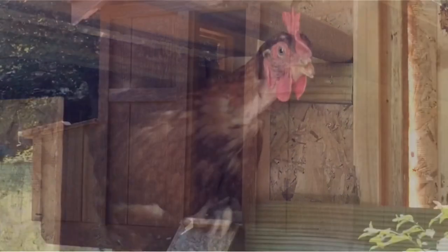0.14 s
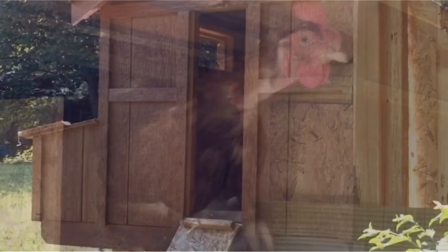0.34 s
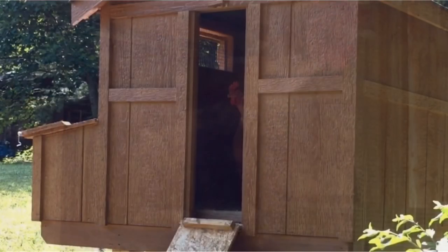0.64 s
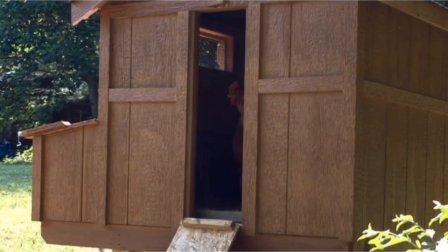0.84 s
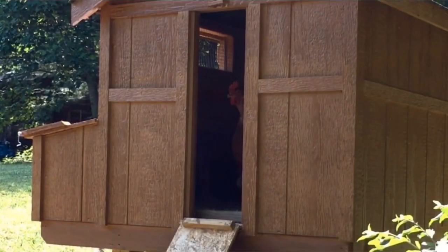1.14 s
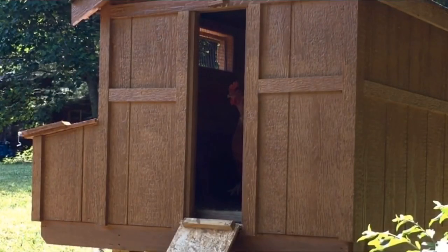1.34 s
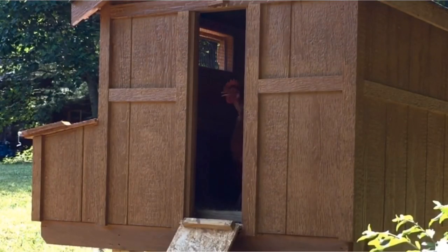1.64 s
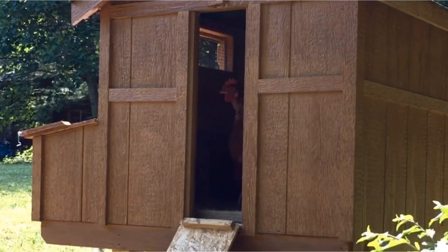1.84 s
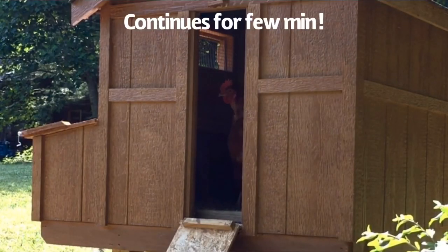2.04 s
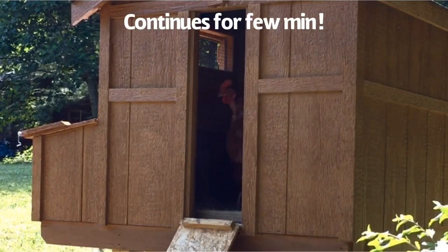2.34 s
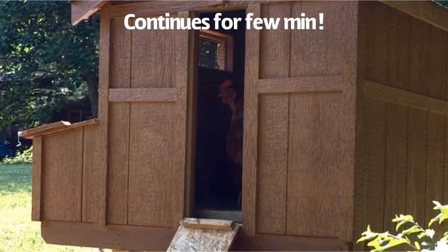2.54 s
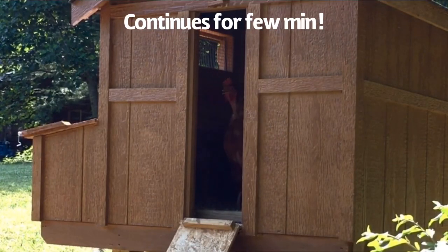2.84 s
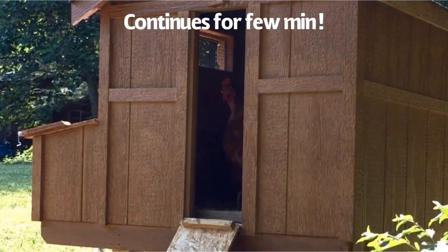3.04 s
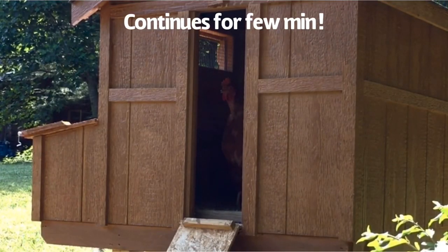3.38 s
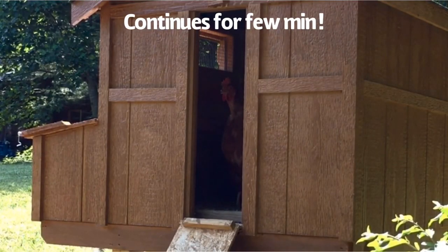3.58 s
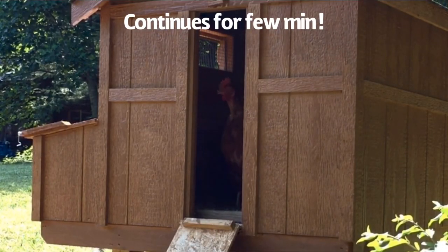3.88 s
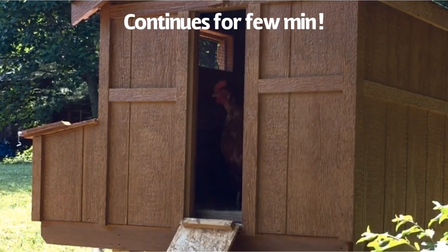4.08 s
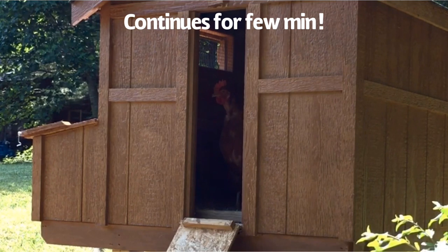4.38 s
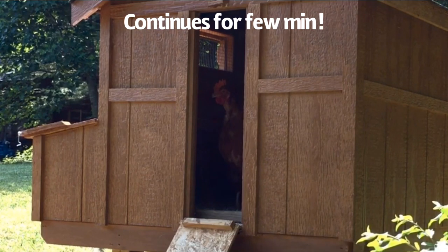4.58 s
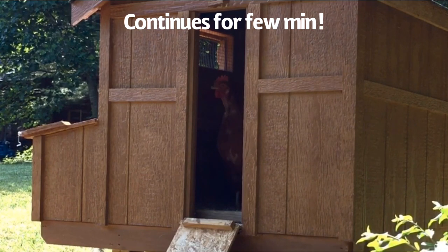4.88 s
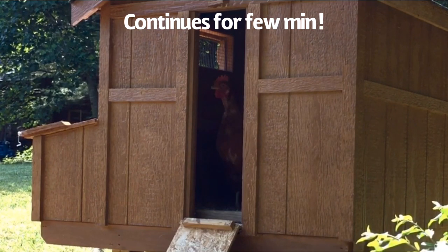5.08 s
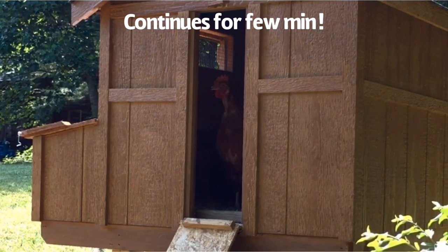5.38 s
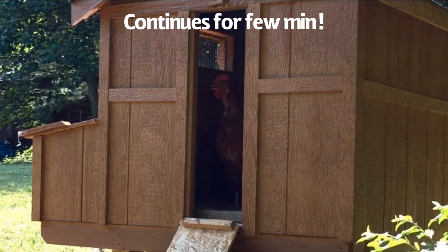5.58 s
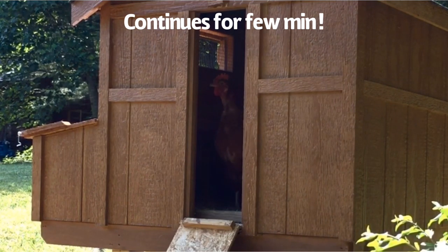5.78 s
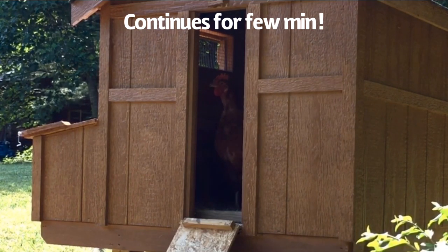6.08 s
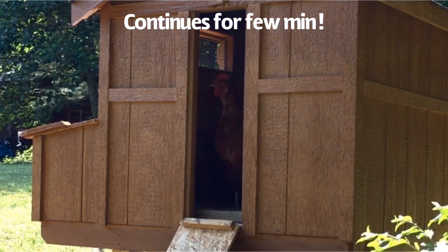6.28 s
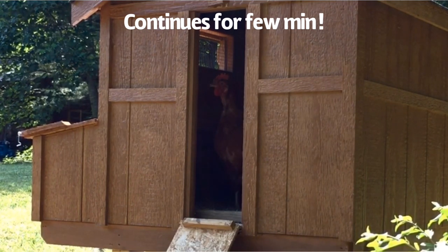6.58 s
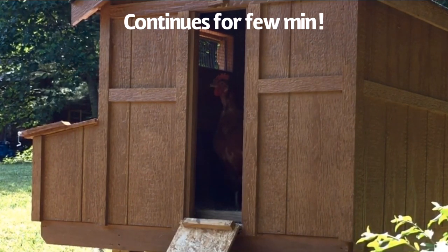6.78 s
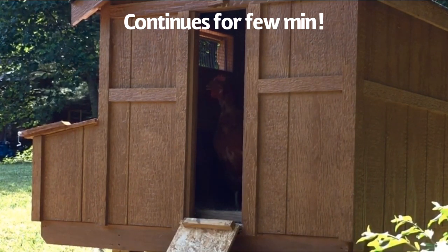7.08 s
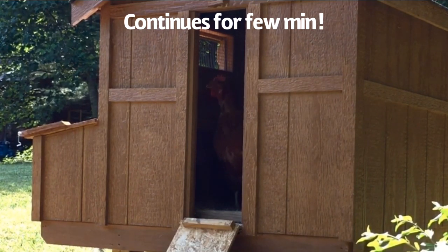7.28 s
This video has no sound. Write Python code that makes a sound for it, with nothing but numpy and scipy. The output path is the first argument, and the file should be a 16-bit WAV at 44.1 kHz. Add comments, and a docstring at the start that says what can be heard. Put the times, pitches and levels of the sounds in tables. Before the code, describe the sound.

In a quiet yard, two hens call at once, the nearer one barking loudly and stopping short within the first second. The other, some way off in a wooden coop, keeps up spaced, raspy clucks that now and then crack upward into a squawk, with a slight ring from the boards. Thin bird whistles, a very faint cricket and a low outdoor rumble lie underneath, and wind softly bumps the microphone.

```python
"""A yard with a wooden hen coop, heard through one microphone. Some way off, a hen in the doorway gives
low rattling clucks; some break into a loud squawk over an octave up. Her syrinx snaps shut once a cycle,
throat and doorway colour the pulses, and the boards ring. At first a second hen, much nearer, barks over
her until an edit cuts off that hen and her echoes mid-bark. Behind them are a songbird, a faint cricket,
light wind and a far rumble."""
import sys
import numpy as np
from scipy import signal
from scipy.fft import rfft, irfft
from scipy.io import wavfile
from scipy.ndimage import uniform_filter1d

SR = 44100
rng = np.random.default_rng(int(sys.argv[2]) if len(sys.argv) > 2 else 0)


def inscribe(sig):
    """Save sig as 16-bit PCM at rate SR to the path in sys.argv[1].

    A 1-D sig is mono; a 2-D sig holds one channel per row.
    Samples are clipped to [-1, 1] before scaling.
    """
    pcm = np.round(np.clip(np.atleast_2d(sig).T, -1, 1) * 32767)
    wavfile.write(sys.argv[1], SR, pcm.astype(np.int16))


N = 327222
T = np.arange(N) / SR


def from_db(db):
    """Decibels to gain."""
    return 10 ** (np.asarray(db) / 20)


def rms_one(x):
    """Scale to rms 1."""
    return x / np.sqrt(np.mean(x ** 2) + 1e-20)


def drift(rate_hz):
    """A smooth random wander of rms 1."""
    r = np.exp(-2 * np.pi * rate_hz / SR)
    return rms_one(signal.lfilter([1], [1, -2 * r, r * r], rng.standard_normal(N + SR))[SR:])


def filtered(x, kind, hz):
    """A gentle low-, high- or band-pass."""
    return signal.sosfilt(signal.butter(2, hz, kind, fs=SR, output="sos"), x)


def resonate(x, hz, width_hz):
    """One resonance with gain 1 at its peak."""
    r = np.exp(-np.pi * width_hz / SR)
    poles = [1, -2 * r * np.cos(2 * np.pi * hz / SR), r * r]
    return signal.lfilter([(1 - r * r) / 2, 0, (r * r - 1) / 2], poles, x)


def coloured(x, points, size=4096):
    """A minimum-phase filter through (Hz, dB) points: it rings after a pulse, never before."""
    hz, db = np.transpose(points)
    grid_hz = np.maximum(np.fft.rfftfreq(size, 1 / SR), 1)
    gain = from_db(np.interp(np.log(grid_hz), np.log(hz), db))
    cepstrum = irfft(np.log(gain), size)
    cepstrum[1:size // 2] *= 2
    cepstrum[size // 2 + 1:] = 0
    return signal.fftconvolve(x, irfft(np.exp(rfft(cepstrum)), size))[:N]


def echoes(x, t60, level_db, gap_s, band_hz):
    """Dense reflections: decaying band noise after a first gap."""
    t = T[:int(t60 * SR)]
    tail = rng.standard_normal(2 * SR)[:len(t)] * from_db(-60 * t / t60)
    tail = filtered(tail, "band", band_hz)
    tail = np.r_[np.zeros(int(gap_s * SR)), tail / np.sqrt(np.sum(tail ** 2))]
    return from_db(level_db) * signal.fftconvolve(x, tail)[:N]


# The open air, far beyond the yard. Each row: frequency in Hz, relative noise density in dB.
AIR_COLOUR = [(20, -17.5), (65, 0.5), (160, -11.5), (300, -20.5), (1200, -27), (3500, -27), (6000, -35.5),
              (15600, -44.5)]
# Wind puffs right on the microphone. Each row: centre in seconds, strength in dB.
WIND_PUFFS = [(1.936, -39.5), (3.763, -46)]

def outdoors():
    """Far rumble and leaf hiss; wind swells the bass and puffs on the microphone."""
    air = rms_one(coloured(rng.standard_normal(N), AIR_COLOUR))
    bass_swell = filtered(air, "low", 120) * (from_db(1.39 * drift(3.6)) - 1)
    out = from_db(-65) * (air + bass_swell)
    for centre, strength_db in WIND_PUFFS:
        u = (T - centre) / .005
        out += from_db(strength_db) * u * np.exp(-u ** 2 / 2)
    return out


def cricket(wing_hz=5200, width_hz=250):
    """The wings' narrow resonance: a faint song that comes and goes."""
    throb = from_db(2.6 * drift(.6))
    song = resonate(rng.standard_normal(N) * throb, wing_hz, width_hz)
    return from_db(-89) * rms_one(resonate(song, wing_hz, width_hz))


# A songbird off in the trees. Each row: start in seconds, first pitch in Hz, seconds to the turn,
# pitch there in Hz, seconds from turn to end, last pitch in Hz, level in dB for a pitch of 3500 Hz.
BIRD_NOTES = [(1.122, 4700, .045, 2650, .033, 3600, -66), (1.825, 3000, .03, 3650, .055, 2700, -65),
              (2.012, 2800, .022, 3900, .03, 2750, -63), (2.04, 3800, .04, 3750, .04, 3600, -65),
              (3.69, 4100, .03, 5400, .05, 5050, -71), (3.925, 2600, .03, 3450, .075, 2300, -65),
              (4.068, 3600, .03, 5200, .028, 2900, -68), (4.118, 2900, .012, 2850, .012, 2800, -66),
              (4.792, 3200, .02, 4100, .028, 5200, -66), (4.91, 2600, .022, 3050, .03, 2700, -62),
              (5.6, 3000, .04, 4400, .04, 2500, -67), (5.72, 2800, .022, 2900, .035, 4200, -65),
              (6.35, 5200, .035, 3500, .08, 5200, -72), (6.497, 2900, .02, 2830, .022, 2800, -68),
              (6.535, 2800, .033, 3750, .045, 2400, -66)]

def songbird():
    """Thin, wavering whistles that glide and turn, smeared by the trees."""
    out = np.zeros(N)
    for start, first_hz, to_turn, turn_hz, to_end, last_hz, level_db in BIRD_NOTES:
        on = slice(int(start * SR), int((start + to_turn + to_end) * SR))
        pitch = np.interp(T[on] - start, [0, to_turn, to_turn + to_end], [first_hz, turn_hz, last_hz])
        pitch = uniform_filter1d(pitch, size=500, mode="nearest")   # rounded turns
        swell = np.hanning(len(pitch)) ** .25 * (3500 / pitch) ** 1.2   # low turns carry best
        out[on] += from_db(level_db) * swell * np.sin(2 * np.pi * np.cumsum(pitch) / SR)
    wavering = out * from_db(3 * drift(40))
    return wavering + echoes(out, t60=.45, level_db=-7, gap_s=.006, band_hz=[2000, 6000])


def coop_reflections(x):
    """Bright first reflections off the door frame and the duller ring of the boards."""
    frame = echoes(x, t60=.084, level_db=-12, gap_s=.001079, band_hz=[2500, 12000])
    boards = echoes(x, t60=.1, level_db=-16, gap_s=.004057, band_hz=[500, 900])
    return frame + boards


def contours(calls):
    """Join calls, each a list of (seconds, Hz, dB, rasp 0-1) points, into pitch, gain and rasp."""
    points = []
    for call in calls:   # each sets in within 3 ms and dies within 9 ms
        first, last = call[0], call[-1]
        points += [(first[0] - .003, first[1], -80, first[3]), *call,
                   (last[0] + .009, last[1], -80, last[3])]
    times, hz, level_db, rasp = np.array(sorted(points)).T
    gain = from_db(np.interp(T, times, level_db)) - from_db(-78.5)
    return np.interp(T, times, hz), gain, np.clip(np.interp(T, times, rasp), 0, 1)


def hen_voice(calls, throat, halving, jitter, shimmer_db, hiss, low_hz, breath_hz=2200):
    """The syrinx snaps shut once a cycle; rasp makes the snaps uneven and breathy."""
    hz, gain, rasp = contours(calls)
    cycles = np.cumsum(hz * (1 + jitter * (.065 + rasp ** 3) * drift(150))) / SR
    sharpness = np.exp(-hz / 4500)   # the pulse's overtones fade with frequency
    snaps = (1 - sharpness ** 2) / (1 - 2 * sharpness * np.cos(2 * np.pi * cycles) + sharpness ** 2)
    unevenness = np.clip(rng.standard_normal(N), -1.6, 1.6)[np.round(cycles).astype(int)]
    snaps *= from_db(shimmer_db * rasp ** 2 * unevenness)
    alternation = np.clip(halving * (rasp - .15) * from_db(6.8 * drift(25)), 0, 1)
    snaps *= 1 + alternation * np.cos(np.pi * cycles)   # every second snap is weaker
    snaps += filtered(snaps, "high", breath_hz) * (from_db(3 * drift(70)) - 1)   # the treble flickers
    pulsed_noise = rng.standard_normal(N) * np.sqrt(np.abs(snaps) + 3.1)
    breath = hiss * (.14 + rasp) * (.59 * filtered(pulsed_noise, "high", breath_hz) + .47 * pulsed_noise)
    thinned = filtered(snaps + breath, "high", low_hz)   # an open beak thins the bass
    voice = coloured(thinned, throat)
    running_rms = np.sqrt(np.abs(uniform_filter1d(voice ** 2, size=900)) + 1e-9)
    return gain * voice / running_rms   # effort alone sets the loudness


# A hen close to the microphone. Each row: start, rise and fall in seconds, base level in dB.
NEAR_BARKS = [(0.005, 0.041, 0.05, -16.5), (0.247, 0.047, 0.046, -13.5), (0.48, 0.05, 0.077, -14.5),
              (0.73, 0.051, 0.027, -14)]
# Her throat, heard at close range. Each row: frequency in Hz, relative gain in dB.
NEAR_COLOUR = [(100, -22.5), (160, -6), (300, -5.5), (440, -20), (865, 1.5), (1000, -0.5), (1180, 0),
               (1550, -17.5), (2220, -7), (2550, -20.5), (2870, -8), (3350, -20.5), (3900, -9.5),
               (5200, -27.5), (6100, -15), (7200, -29), (8500, -17.5), (15000, -27)]

def near_hen(hz=438.8, edit_s=.781):
    """Barks rattle, jump late to a firm peak and die hoarsely; an edit cuts her and her echoes off."""
    barks = [[(start, .96 * hz, db - 23, .7),
              (start + .7 * rise, .83 * hz, db - 7, .6),
              (start + .85 * rise, hz, db - 2, .35),
              (start + rise + .27 * fall, hz, db - 3.5, .3),
              (start + rise + .45 * fall, 1.4 * hz, db - 10.5, .75),
              (start + rise + fall, .69 * hz, db - 36, 1)] for start, rise, fall, db in NEAR_BARKS]
    hen = hen_voice(barks, NEAR_COLOUR, halving=.32, jitter=.22, shimmer_db=7, hiss=.9, low_hz=100.05)
    return (hen + from_db(4) * coop_reflections(hen)) * (T < edit_s)


# Held tones from the coop doorway; those that touch form one squawk. Each row: start and length in
# seconds, first and last pitch in Hz, level in dB, first and last rasp from 0 to 1.
SQUAWK_TONES = [(0, 0.089, 641.4, 610.7, -25.5, 0.1, 0.3), (0.083, 0.097, 608, 663, -28.5, 0.18, 0.4),
                (0.429, 0.037, 477.6, 462, -34, 0.06, 0.23),
                (0.469, 0.084, 550.7, 562.4, -25.5, 0.34, 0.21), (1.523, 0.05, 556, 579, -27, 0.62, 0.36),
                (1.571, 0.096, 627, 649, -26, 0.29, 0.03), (2.824, 0.078, 574.5, 593, -25, 0.48, 0.06),
                (2.911, .1, 610.5, 663, -27.5, 0.54, 0.43), (3.292, .047, 559.4, 577.6, -22, .1, 0.06),
                (4.596, 0.033, 551, 584, -24.5, 0.4, .1), (4.626, 0.113, 620, 634, -26.5, 0.06, 0.28),
                (5.463, .068, 585.3, 579.8, -23.5, 0.14, .03), (5.537, 0.022, 638.6, 677, -26.5, 0.19, .25),
                (6.908, 0.028, 571, 588, -25, .3, 0.34), (6.932, 0.056, 638, 619.6, -27, 0.06, 0.02),
                (6.985, 0.11, 569.2, 592, -27.5, 0.06, 0), (7.401, 0.034, 560.7, 542, -26.5, .25, 0.22)]

def squawks(catch_s=.007, flip_s=.005, collapse_s=.009, fade_s=.025):
    """A squawk catches, holds one tone or flips between several, collapses hoarsely and fades."""
    calls, end = [], -1
    for start, length, first_hz, last_hz, db, rasp, last_rasp in SQUAWK_TONES:
        if start - end < 2 * flip_s:   # the voice dips and flips to this tone instead of collapsing
            calls[-1][-2:] = [(start, (first_hz + held_hz) / 2, db - 11, rasp),
                              (start + flip_s, first_hz, db, rasp)]
        else:
            calls.append([(start, .95 * first_hz, db - 3.5, .4), (start + catch_s, first_hz, db, rasp)])
        end, held_hz = start + length, last_hz
        calls[-1] += [(end - flip_s, last_hz, db - 2, last_rasp),
                      (end + collapse_s - flip_s, 550.3, -30.5, .92),
                      (end + collapse_s + fade_s, 515.8, -47.5, .9)]
    return calls


# Quiet clucks from the doorway. Each row: start in seconds, seconds to the top, base level in dB.
QUIET_CLUCKS = [(1.014, 0.049, -43.5), (2.218, 0.046, -43.5), (3.849, 0.04, -42), (4.161, .05, -40),
                (6.115, 0.055, -43)]

def quiet_clucks(hz, length_s=.092):
    """A quiet cluck climbs cleanly to its pitch and falls away again."""
    return [[(start, .77 * hz, db - 11, .5),
             (start + .55 * top, .96 * hz, db, .15),
             (start + top, hz, db + 1, .15),
             (start + 1.4 * top, .91 * hz, db - 4, .4),
             (start + length_s, .8 * hz, db - 11, .7)] for start, top, db in QUIET_CLUCKS]


# Stronger clucks from the same spot. Each row: start in seconds, seconds until the voice cracks,
# levels before and after the crack in dB.
CRACKING_CLUCKS = [(0.38, 0.032, -38, -38.5), (0.695, 0.047, -47, -30), (1.399, 0.074, -42.5, -40),
                   (1.903, 0.039, -42, -41.5), (2.718, 0.07, -42, -38.5), (3.197, 0.028, -40, -37),
                   (3.537, 0.04, -43, -37), (4.488, 0.073, -40, -38.5), (4.963, 0.045, -40.5, -42),
                   (5.325, 0.075, -41, -38), (5.772, 0.045, -41, -36.5), (6.797, 0.069, -42.5, -44.5),
                   (7.292, 0.036, -40.5, -40)]

def cracking_clucks(hz, lone_s=.086, lead_in_s=.16, sag_db=-7, swell_db=3.5):
    """A strong cluck cracks upward into a rattle that sags, or swells into a squawk close ahead."""
    calls = []
    for start, crack, early_db, late_db in CRACKING_CLUCKS:
        to_squawk = [tone[0] - start for tone in SQUAWK_TONES if 0 < tone[0] - start < lead_in_s]
        length, change_db = (to_squawk[0], swell_db) if to_squawk else (lone_s, sag_db)
        calls.append([(start, .83 * hz, early_db - 11, .45),
                      (start + .41 * crack, .95 * hz, early_db, .22),
                      (start + crack - .004, hz, early_db + .5, .25),
                      (start + crack + .008, 1.1 * hz, late_db, .95),
                      (start + length, 1.1 * hz, late_db + change_db, .95)])
    return calls


# The farther hen's throat and the doorway, heard across the yard. Each row: frequency in Hz,
# relative gain in dB in a cluck, then in a squawk with the beak wide open.
DOORWAY_COLOUR = [(306, -22.5, -32), (570, -3, -16), (710, 3.5, -10.5), (895, -5, -5), (1156, 7, 3),
                  (1240, -2.5, 1), (1514, -17, -13), (1660, -12, -13), (1950, -8.5, -22.5),
                  (2313, -20, -11), (2540, -6, -8.5), (2816, -21, -30.5), (3263, -15.5, -16.5),
                  (3660, -1.5, -5), (3980, -9.5, -17.5), (4500, -13.5, -16), (5077, -30, -33),
                  (5640, -15, -13.5), (7400, -24, -23.5), (9420, -13.5, -18.5), (10100, -29.5, -29),
                  (12000, -18.5, -19.5), (15000, -24, -23.5)]
# Her treble at the microphone as she turns her head. Each row: time in seconds, gain in dB.
HEAD_TURNS = [(1.5, -1), (3.1, 1.5), (5.5, -5)]

def coop_hen(cluck_hz=241.1):
    """Clucks and squawks scatter off the frame, ring in the coop and return faintly from the trees."""
    hz, cluck_db, squawk_db = np.transpose(DOORWAY_COLOUR)
    clucks = quiet_clucks(cluck_hz) + cracking_clucks(cluck_hz)
    hen = hen_voice(clucks, np.c_[hz, cluck_db],
                    halving=0, jitter=.14, shimmer_db=3.5, hiss=3, low_hz=234)
    hen += hen_voice(squawks(), np.c_[hz, squawk_db],
                     halving=.85, jitter=.08, shimmer_db=5, hiss=1.6, low_hz=300)
    treble_gain = from_db(np.interp(T, *np.transpose(HEAD_TURNS)))
    hen += filtered(hen, "high", 9000) * (treble_gain - 1)
    coop = coop_reflections(hen)
    trees = echoes(hen, t60=.98, level_db=-42, gap_s=.039, band_hz=[800, 3500])
    return hen + coop + trees


def scene():
    """Both hens and the yard behind them reach one microphone."""
    return (coop_hen() + near_hen() + songbird() + cricket() + outdoors())[None]


def record(dry):
    """A steep low-pass cuts the highest treble."""
    return signal.sosfilt(signal.cheby2(20, 50, 15850, fs=SR, output="sos"), dry)


dry = scene()
out = record(dry)
inscribe(out)
```